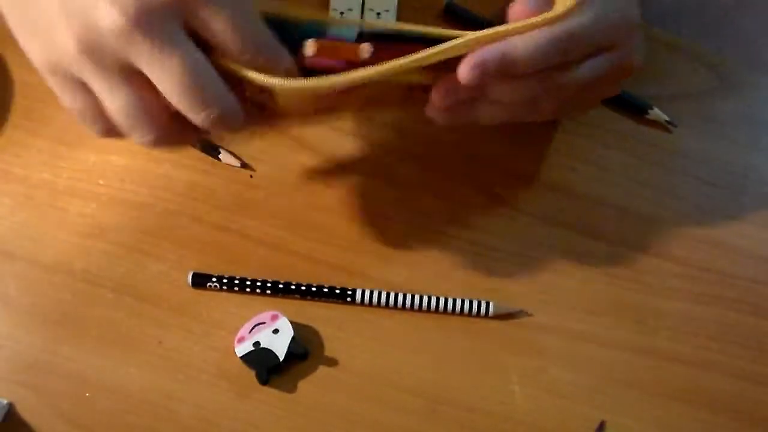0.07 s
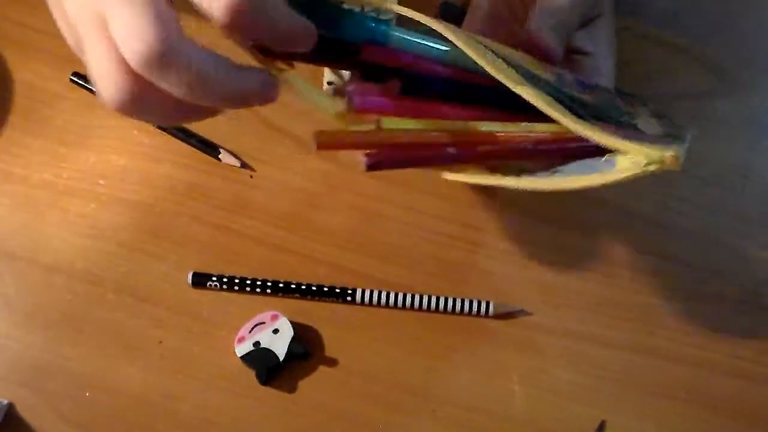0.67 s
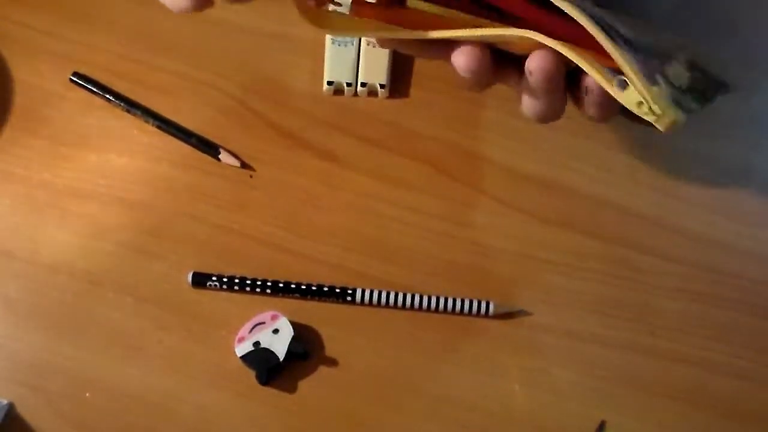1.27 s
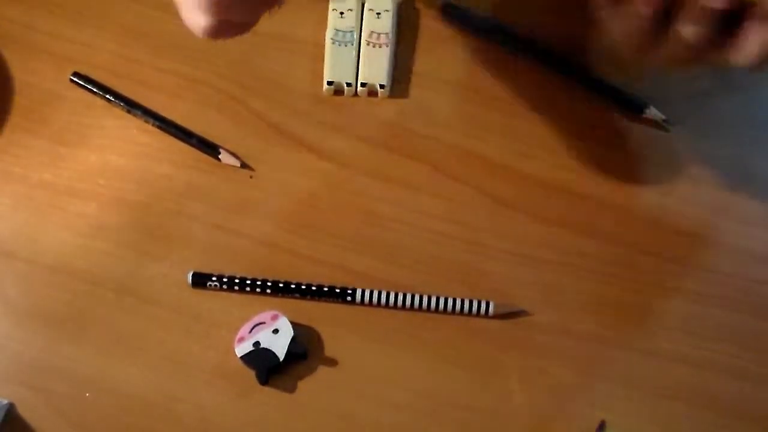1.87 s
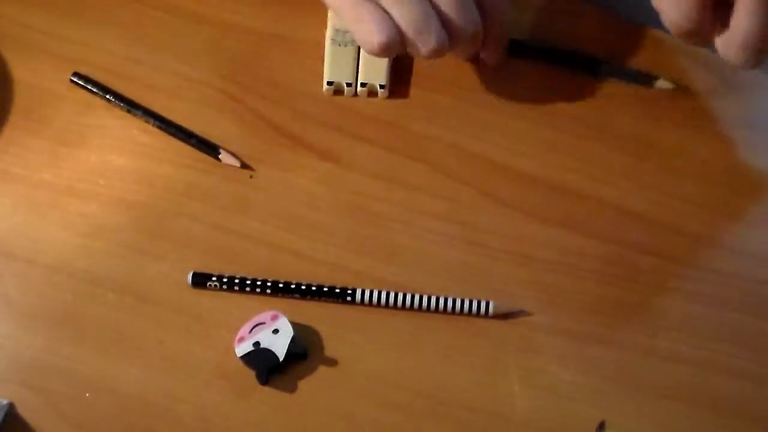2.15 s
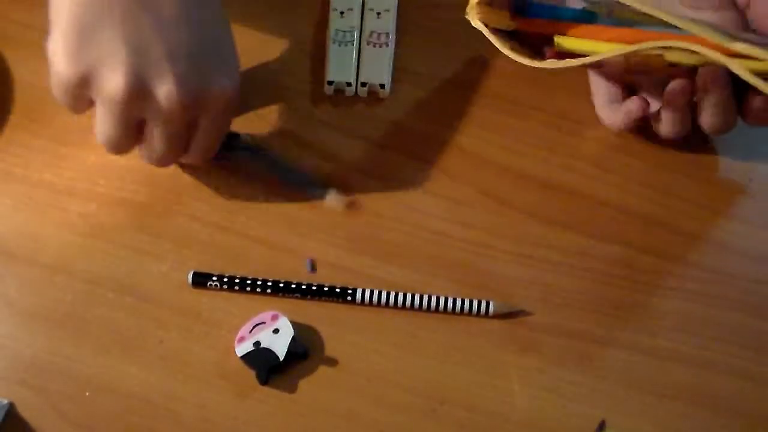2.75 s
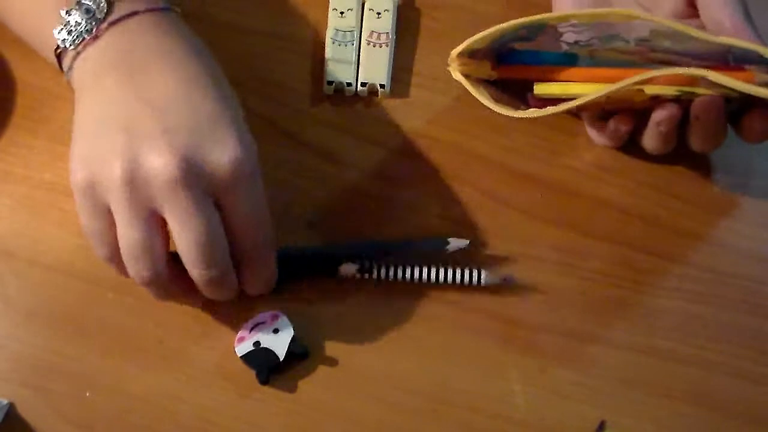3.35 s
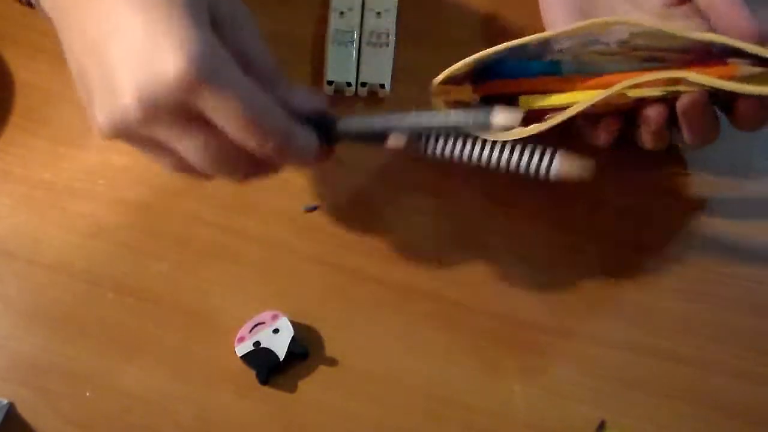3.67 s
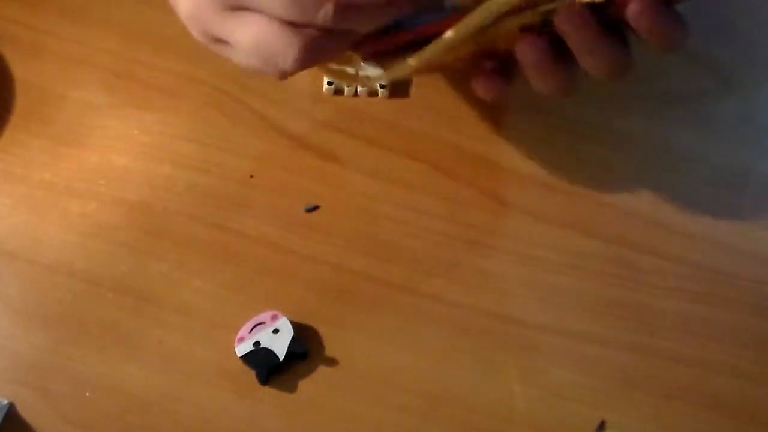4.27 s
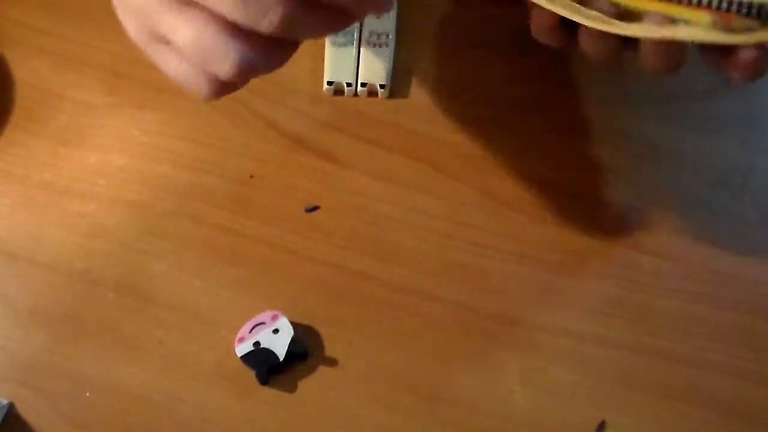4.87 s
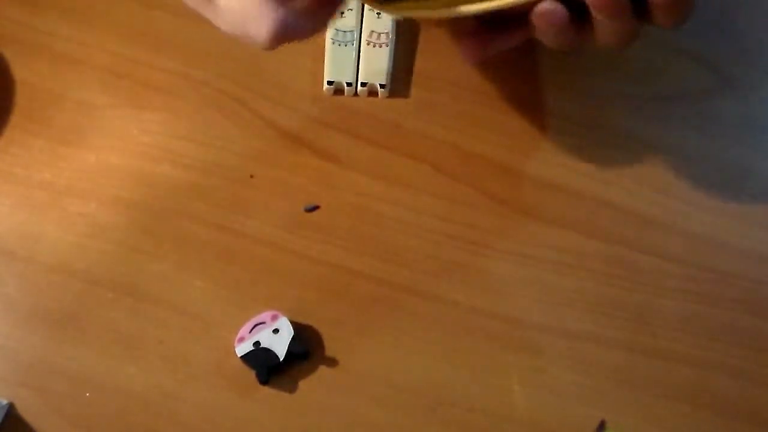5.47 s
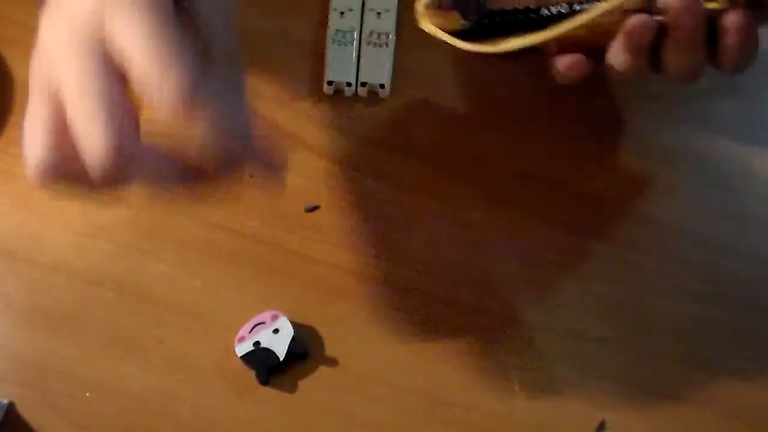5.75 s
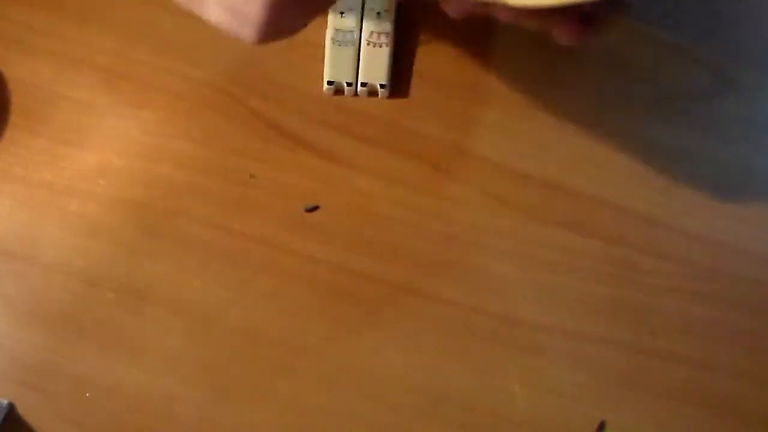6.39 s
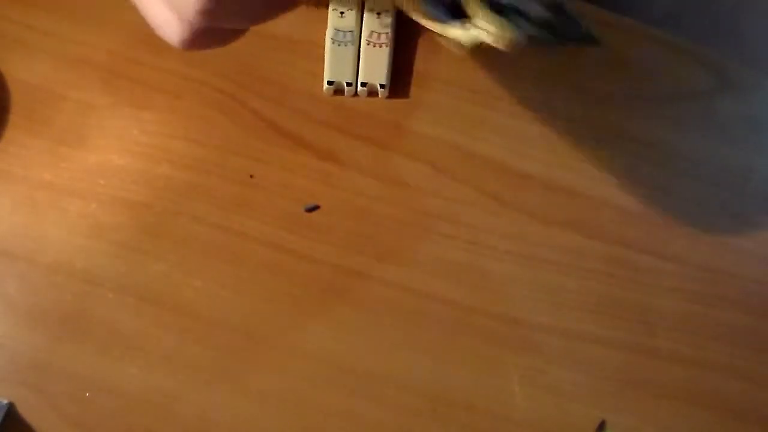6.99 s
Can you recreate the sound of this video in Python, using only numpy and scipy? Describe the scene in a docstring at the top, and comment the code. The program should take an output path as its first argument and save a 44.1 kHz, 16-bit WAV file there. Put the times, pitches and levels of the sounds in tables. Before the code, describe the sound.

Wooden coloured pencils click, clatter and scrape into a rustling fabric case, with a few taps on a wooden desk.

```python
"""At a wooden desk in a small, quiet room, coloured pencils are shuffled into a soft pencil case.
The wooden barrels scrape in many tiny slips and ring briefly when they knock together, while
the fabric rustles and the case bumps against the hand. Loose pencils and an eraser are picked up,
and each tap makes the desk top boom and ring. Under it all lie a low rumble and a faint hiss."""
import sys
import numpy as np
from scipy import signal
from scipy.fft import rfft, irfft, next_fast_len
from scipy.io import wavfile
from scipy.ndimage import map_coordinates

SR = 44100
rng = np.random.default_rng(int(sys.argv[2]) if len(sys.argv) > 2 else 0)


def log_audio(samples):
    """Write samples as a 16-bit WAV file to the path given in sys.argv[1]."""
    # one column per channel
    frames = np.atleast_2d(samples).T
    # limit to full scale, then quantise
    limited = np.clip(frames, -1, 1)
    pcm = np.round(limited * 32767).astype(np.int16)
    wavfile.write(sys.argv[1], SR, pcm)


N = 318381

# How loud the room's rumble is. Each row: time in seconds, level in dB.
RUMBLE_LEVELS = [(0, -61), (.5, -55.5), (1.43, -50.5), (1.871, -57), (2.2, -51), (2.9, -57.5),
                 (4.12, -54.5), (4.85, -63), (5.3, -52), (6.05, -70), (6.33, -55), (7.22, -57)]
# The tone of four noises. Each row: frequency in Hz, relative level in dB.
RUMBLE_TONE = [(15, -16.5), (26, 3), (33, -10), (50, -7.5), (70, -21.5), (110, -15), (250, -66)]
HISS_TONE = [(30, 1.5), (110, -6.5), (250, -5.5), (400, -11.5), (900, -13.5), (2000, -14.5), (6000, -19),
             (14000, -23)]
FABRIC_TONE = [(2500, -11), (5000, -4), (7000, -0.5), (10500, -2.5), (14000, -3)]
BUMP_TONE = [(40, -2), (90, -3.5), (150, -3), (235, 2.5), (340, -8), (520, -6), (900, -12.5), (2000, -38)]
# How hard the hands work as they shake the pencils down, put the case aside, push in the loose pencils,
# add the eraser and close the case. Each row: time in seconds, effort in dB.
HAND_EFFORT = [(0, -48), (0.099, -66), (.29, -45), (.43, -48), (.59, -35), (.73, -38.5), (0.779, -48),
               (.88, -40), (1.01, -41), (1.089, -52), (1.16, -40), (1.35, -50), (1.48, -43), (1.62, -50),
               (1.869, -45.5), (1.99, -51), (2.5, -52), (2.85, -55.5), (3.032, -80), (3.42, -51),
               (3.58, -72), (3.75, -64), (4.03, -72), (4.16, -51.5), (4.32, -53), (4.42, -38.5),
               (4.56, -38), (4.619, -53.5), (4.7, -50.5), (4.781, -74), (4.96, -52), (5.051, -66),
               (5.22, -52.5), (5.58, -53), (5.66, -43), (5.77, -64), (5.85, -57), (5.93, -85), (6.2, -78),
               (6.4, -61), (6.56, -64.5), (6.75, -47), (6.881, -53), (7.01, -47), (7.22, -68)]
# Where the bundle of pencils and the hollow of the case ring.
# Each row: pitch in Hz, width in Hz, relative level in dB.
BUNDLE_RINGS = [(506.5, 26, -6), (710, 150, -26), (1300, 490, -14.5), (1540, 93, -6.5), (1785, 37, -9),
                (2071, 147, -5.5), (2578, 79, -5.5), (3210, 780, -16.5), (3740, 380, -19.5), (5540, 41, -8),
                (7070, 200, -5.5), (8900, 1600, -21)]
CASE_RINGS = [(1620, 360, -2), (2590, 240, -3)]
# How deep in the case the barrels slide. Each row: time in seconds, depth from 0 (outside) to 1 (inside).
CASE_DEPTH = [(0, 0), (2.6, 0.27), (4.15, 0.15), (4.55, 0.74), (5.4, 0.2), (7.22, 0.02)]
# The fabric drags along the pencils, and the case bumps the hand.
# Each row: time of the peak in seconds, half length in seconds, level in dB.
FABRIC_SWISHES = [(.62, .08, -51), (3.5, 0.014, -55), (3.75, 0.086, -69), (4.413, 0.044, -47.5),
                  (5.502, 0.037, -52.5), (6.715, 0.062, -54)]
CASE_JOLTS = [(.58, 0.027, -61), (4.365, 0.012, -47), (4.55, 0.031, -55), (5.16, 0.042, -65),
              (5.66, 0.013, -53), (6.63, 0.054, -59)]
# The borders in Hz of five ranges, from low to high: thud, knock, wood, click and snap.
RANGE_EDGES = [74, 350, 900, 2800, 6500, 14500]
# An average clack: its relative levels in dB in the wood, click and snap ranges.
CLACK_TONE = [0, -1.25, -8]
# The main knocks of pencil on pencil. Each row: start in seconds, level in dB, hardness in dB per octave,
# pitch of the struck barrel in Hz, seconds for the chatter to fade by 60 dB.
PENCIL_CLACKS = [(0.152, -44.5, -1, 1270, 0.083), (0.2057, -32.5, -11, 2190, 0.022),
                 (0.2854, -30, -3.5, 1600, 0.043), (.291, -32, -2, 2080, .04),
                 (.316, -29, 0.5, 4120, 0.042), (.37, -33, 1.5, 2040, 0.067), (.396, -34, 3.5, 2130, 0.04),
                 (0.45, -31.5, 0.5, 1570, 0.063), (.455, -32, 0.5, 1530, 0.07),
                 (0.5008, -36, -5, 1950, 0.12), (0.5645, -46, 8.5, 1100, 0.16), (.57, -31, -8, 995, 0.16),
                 (.581, -34, 5.5, 2120, 0.052), (.589, -38, 6, 7040, 0.036), (.611, -49, 11.5, 10600, .034),
                 (0.621, -52, 12, 1100, .032), (.651, -50.5, 9.5, 6960, 0.066),
                 (0.6736, -45, 7, 2060, 0.032), (.694, -45.5, 7.5, 1530, 0.12),
                 (.725, -35, 1.5, 2090, 0.06), (.732, -32.5, 2, 2400, .024), (.807, -35.5, 0.5, 2040, 0.12),
                 (.893, -34.5, -1, 2520, 0.054), (0.9631, -29, 3, 4200, 0.036),
                 (1.018, -32.5, 1.5, 2120, 0.065), (1.062, -34.5, -19, 1177, .02),
                 (1.1379, -33.5, 2, 2100, 0.081), (1.173, -35, -3, 2080, 0.058),
                 (1.459, -36.5, -2, 2130, 0.054), (1.47, -25, 0, 4020, 0.025),
                 (1.539, -37, -1, 1770, 0.078), (1.73, -40.5, 2, 1560, 0.065),
                 (1.82, -31.5, -4, 2800, 0.041), (1.833, -37.5, -3, 2050, 0.16),
                 (1.89, -35, -2, 1720, 0.038), (1.8982, -26.5, 0.4, 3310, 0.054),
                 (2.026, -42.5, -1, 1920, 0.2), (2.092, -40, -1, 2100, 0.022), (2.14, -35, -7, 1530, 0.04),
                 (2.276, -38, -2, 1656, 0.095), (2.3113, -42.5, -8, 2090, 0.041),
                 (2.361, -40.5, -0.5, 7160, 0.068), (2.422, -43, -19, 1840, .09),
                 (2.51, -50, -1, 1570, 0.045), (2.611, -40.5, 0, 1260, 0.078),
                 (3.1269, -37, -1.5, 2160, 0.021), (4.124, -40, -2.5, 2120, 0.085),
                 (4.133, -43.5, 4, 1660, 0.078), (4.359, -46, -3, 1420, 0.071),
                 (4.403, -44, 5, 3620, 0.081), (4.473, -42, 4.5, 1560, .08),
                 (4.504, -27.5, 1.5, 1560, 0.062), (4.548, -25.5, -2.5, 1670, 0.043),
                 (4.568, -41, 6, 1760, 0.088), (4.575, -29, 3, 1630, 0.031), (4.643, -45, 0.5, 1580, 0.098),
                 (4.688, -43, -2, 1515, 0.1), (4.857, -50, -8.5, 1530, .08), (4.95, -46, -0.5, 4100, .04),
                 (4.963, -46.5, 1, 1640, 0.045), (5.206, -44.5, -3, 1510, 0.15),
                 (5.232, -39, -3.5, 1470, 0.044), (5.6191, -34, 3, 1720, 0.064),
                 (5.679, -36, -1.5, 1820, 0.064), (5.686, -45.5, 11.5, 2550, .022),
                 (5.701, -38, -4, 1520, 0.04), (5.749, -42.5, 1.5, 3820, .026), (5.8712, -47, 0, 4000, .02),
                 (5.981, -58, 0, 1250, 0.035), (6.059, -57.5, 2, 2700, 0.026),
                 (6.252, -51.5, -13, 1300, 0.016), (6.299, -52.5, 0.5, 2650, 0.044),
                 (6.704, -41.5, 0, 1550, 0.082), (6.794, -34.5, -4, 1620, 0.049),
                 (6.926, -38.5, -3.5, 2170, 0.06), (6.987, -39.5, -1.5, 1580, 0.11),
                 (7.089, -45.5, -3.5, 1670, 0.095)]
# Taps on the desk. Each row: start in seconds, level in dB, hardness in dB per octave, kind of contact.
DESK_TAPS = [(2.177, -27.5, -0.5, "hand"), (2.659, -32.5, -.5, "tip"), (2.693, -36, .5, "tip"),
             (2.714, -38.5, 0, "tip"), (2.789, -30, 1, "barrel"), (2.814, -51, 2, "barrel"),
             (2.834, -34.5, 2.5, "rebound"), (2.842, -34, -3, "rebound"), (2.864, -42, 0, "barrel"),
             (2.983, -53, 0.5, "hand"), (3.2228, -32, 2, "barrel"), (3.32, -39.5, -1, "barrel"),
             (3.356, -36, 0, "barrel"), (6.066, -49.5, 0.5, "eraser"), (6.086, -53, 1, "eraser"),
             (6.125, -49.5, -2.5, "eraser")]
# The tone of each kind of contact. Each entry: relative levels in dB in the five ranges, thud to snap.
CONTACT_TONES = {"hand": (0.5, -12.5, -11.5, -17.5, -19.5), "tip": (-6.5, -1, -18, -14, -7.5),
                 "barrel": (-10, -3, -1, -3, -9.5), "rebound": (-22, -30, -3.5, -10, -21),
                 "eraser": (-1, -25, -20, -16, -27)}
# The desk top's low notes. Each row: pitch in Hz, relative level in dB, seconds to fade by 60 dB.
DESK_NOTES = [(107.3, 0, 0.48), (180, -6, 0.41), (212, 5, 0.25), (230, 8.5, 0.12), (293, -0.5, .22),
              (402, -16, 0.096), (466, -6, 0.25), (504, 10, 0.23), (576, 0, 0.33)]
# The thin ring of a loose pencil on the desk. Each row: pitch in Hz, width in Hz, relative level in dB.
LOOSE_PENCIL_RINGS = [(4080, 200, 5), (5720, 120, 1), (10200, 200, 7), (11800, 400, 13)]
# How long the desk and the room ring on. Each row: frequency in Hz, seconds to fade by 60 dB.
DESK_FADE = [(100, 0.37), (500, 0.4), (2000, 0.38), (5000, 0.19), (12000, 0.12)]
ROOM_FADE = [(200, 0.48), (2000, 0.31), (6000, 0.27), (13000, 0.21)]
# Stereo width. Sounds are built as mid (what left and right share) and side (how they differ).
# Each row: frequency in Hz, gain of the side in dB.
STEREO_WIDTH = [(60, -14), (200, -21.5), (700, -19.5), (1400, -22.5), (2800, -15), (5500, -6.5),
                (10000, -2.5), (14000, -4)]
# How the microphones soften the treble. Each row: frequency in Hz, gain in dB.
MICROPHONE_TONE = [(10500, 0), (12000, -2.5), (14000, -5.5)]

USUAL_EFFORT_DB, FABRIC_DB, BUMP_DB = -44.5, -54.5, -57  # the usual effort and the base levels it gives
FABRIC_GROWS, BUMP_GROWS = 0.83, 0.72  # dB gained for each extra dB of effort
CLINK_HZ, CLINK_SPREAD = 4020, 0.013  # the high bending note all pencils share; it varies by about 1.3%
TREBLE_LIMIT_HZ = 14300


def amp(db):
    """Turn decibels into a number to multiply by."""
    return 10 ** (np.asarray(db) / 20)


def unit(x):
    """Scale each channel to an average (rms) size of 1."""
    return x / np.sqrt(np.mean(x ** 2, axis=-1, keepdims=True) + 1e-20)


def at_pitch(rows, hz):
    """Read between (Hz, value) rows, giving each octave about the same room."""
    pitches, values = np.transpose(rows)
    return np.interp(np.log(hz + 1), np.log(pitches + 1), values)


def over_time(rows):
    """Join (seconds, value) rows with straight lines, one value for each sample."""
    return np.interp(np.arange(N) / SR, *np.transpose(rows))


def wobble(rate):
    """A smooth curve through `rate` random points a second."""
    return map_coordinates(rng.standard_normal(int(N * rate / SR) + 4), [np.arange(N) * rate / SR])


def filtered(x, response):
    """Multiply each frequency in x by response(hz)."""
    length = x.shape[-1]
    padded = next_fast_len(length + SR // 10)
    return irfft(rfft(x, padded) * response(np.fft.rfftfreq(padded, 1 / SR)), padded)[..., :length]


def noise(tone):
    """Mid and side noise with the given tone, at an average size of 1."""
    return unit(filtered(rng.standard_normal((2, N)), lambda hz: amp(at_pitch(tone, hz))))


def resonances(rings, hz):
    """How an object answers each frequency, given the (pitch, width, dB) rows at which it rings."""
    return sum(amp(db) * 1j * hz * width / (pitch * pitch - hz * hz + 1j * hz * width)
               for pitch, width, db in rings)


def band(x, low_hz, high_hz):
    """Keep the sound between two frequencies."""
    return signal.sosfilt(signal.butter(5, [low_hz, high_hz], btype="band", fs=SR, output="sos"), x)


def set_ranges(x, edges, levels_db, span_s):
    """Scale each frequency range so that its first span_s seconds have the wanted level."""
    parts = [band(x, low, high) for low, high in zip(edges, edges[1:])]
    return sum(amp(db) * part / part[:, :int(span_s * SR)].std(axis=1, keepdims=True)
               for part, db in zip(parts, levels_db))


def tilted(tone, hardness_db):
    """Tip a tone's levels around the wood range: a harder contact has more treble and less bass."""
    centres = np.sqrt(np.multiply(RANGE_EDGES[:-1], RANGE_EDGES[1:]))
    octaves = np.log2(centres / centres[2])
    return np.array(tone) + hardness_db * octaves[-len(tone):]


def swell(t, attack_s):
    """A quick rise from 0 to 1, as a contact builds up."""
    return 1 - np.exp(-t / attack_s)


def fade(t, t60):
    """A smooth fall of 60 dB every t60 seconds."""
    return np.exp(-np.log(1000) * t / t60)


def tail(fade_times):
    """Half a second of dense ringing: noise in which each frequency dies at its own speed."""
    hz, t, spectrum = signal.stft(rng.standard_normal((2, SR // 2)), SR, nperseg=256)
    dying = spectrum * amp(-60 * t / at_pitch(fade_times, hz)[:, None])
    return signal.istft(dying, SR, nperseg=256)[1][:, :SR // 2]


def surges(rows):
    """A smooth rise and fall of gain for each (peak time, half length, dB) row."""
    t = np.arange(N) / SR
    return sum(amp(db) * np.exp(-((t - peak_s) / half_s) ** 2) for peak_s, half_s, db in rows)


def add(track, start_s, sound):
    """Mix a sound into the track at its start time."""
    part = track[:, max(round(start_s * SR), 0):][:, :sound.shape[1]]
    part += sound[:, :part.shape[1]]


def rumble_and_hiss(hiss_db=-61.5, hiss_side_db=-2, rumble_side_db=-10):
    """The room's low rumble, nearly alike at both microphones, and their own faint hiss."""
    rumble = amp(over_time(RUMBLE_LEVELS)) * noise(RUMBLE_TONE)
    hiss = amp(hiss_db) * noise(HISS_TONE)
    return np.array([rumble[0] + hiss[0], amp(rumble_side_db) * rumble[1] + amp(hiss_side_db) * hiss[1]])


def slips(per_second, spread_db):
    """Wood slips on wood in tiny clicks of random size, at random moments."""
    size = amp(spread_db * np.minimum(rng.exponential(size=N), 3))
    slipping = rng.random(N) < per_second / SR
    return unit(slipping * size * rng.standard_normal((2, N)))


def bundle_rings(detune, vary_db):
    """The bundle rings a little differently with each grip and point of contact."""
    return [(hz * (1 + rng.normal(0, detune)), width, db + rng.normal(0, vary_db))
            for hz, width, db in BUNDLE_RINGS]


def scraping(direct=0.23, swing_db=5.0, pairs=4):
    """Pairs of barrels take turns slipping, each with its own ring; inside the case they sound hollow."""
    total = 0
    for _ in range(pairs):
        rings = bundle_rings(detune=0.035, vary_db=6)
        clicks = slips(per_second=1800, spread_db=-0.5)
        scrape = filtered(clicks, lambda hz: direct + resonances(rings, hz))
        total = total + amp(swing_db * wobble(30)) * scrape
    outside = unit(band(total, 392, 5000))
    inside = unit(filtered(outside, lambda hz: resonances(CASE_RINGS, hz)))
    depth = np.clip(over_time(CASE_DEPTH), 0, 1)
    return (1 - depth) * outside + depth * inside


def handling(scrape_db=-0.9, jerk_db=3.5):
    """One effort of the hands makes the barrels scrape, the fabric rustle and the case bump softly."""
    effort_db = over_time(HAND_EFFORT)
    extra_db = effort_db - USUAL_EFFORT_DB
    jerks_db = jerk_db * wobble(70)  # the sliding catches and lets go
    barrels = amp(effort_db + scrape_db + jerks_db) * scraping()
    fabric_gain = amp(FABRIC_DB + FABRIC_GROWS * extra_db) + surges(FABRIC_SWISHES)
    fabric = fabric_gain * amp(jerks_db) * noise(FABRIC_TONE)
    bump_gain = amp(BUMP_DB + BUMP_GROWS * extra_db) + surges(CASE_JOLTS)
    bumps = bump_gain * amp(4.6 * wobble(25)) * noise(BUMP_TONE)
    return barrels + fabric + bumps


def clack(levels_db, barrel_hz, clink_hz, t60,
          blow=11, crack_db=8, crack_share=0.19, rebound=0.35, barrel_db=5, clink_db=-4.0):
    """A hard hit, a quick rebound and a dying chatter make one barrel and its neighbours ring."""
    t = np.arange(SR // 10) / SR
    since_rebound = t - rng.uniform(.001, .0035)
    contact_s = crack_share * t60  # square blows are brief, glancing ones drag and chatter on
    crack = fade(t, contact_s) + rebound * (since_rebound > 0) * fade(np.abs(since_rebound), contact_s)
    strength = swell(t, attack_s=contact_s / 8) * (fade(t, t60) + amp(crack_db) * crack)
    force = strength * rng.standard_normal((2, len(t)))
    force[:, SR // 1000] += blow * rng.choice([-1, 1], size=2)  # the full blow follows the first touch
    clink_width = 110 + (clink_hz / 300) ** 2  # wider means shorter: wood damps high notes much faster
    rings = bundle_rings(detune=0.025, vary_db=6.0)
    rings += [(barrel_hz, barrel_hz / 20, barrel_db), (clink_hz, clink_width, clink_db)]
    ringing = filtered(force, lambda hz: .2 + resonances(rings, hz))
    low_db = levels_db[0] - 19  # light barrels give off little sound below their bending notes
    return set_ranges(ringing, [390] + RANGE_EDGES[2:], [low_db, *levels_db], span_s=0.0036)


def jostling(offset_db=-1.5, vary_db=2.1, hardness_db=0.4,
             barrel_hz=1900, pitch_spread=0.225, t60=0.081, count=36):
    """Pencils jostle in small random clacks, closer together and louder when the hands work harder."""
    track, effort_db = np.zeros((2, N)), over_time(HAND_EFFORT)
    work_done = np.cumsum(amp(effort_db / 2))
    # one clack falls somewhere in each equal share of the work
    starts = np.searchsorted(work_done, work_done[-1] * (np.arange(count) + rng.random(count)) / count)
    for start, (size, hardness, pitch) in zip(starts, rng.standard_normal((count, 3))):
        tone = tilted(CLACK_TONE, hardness_db + 2 * hardness)
        levels_db = effort_db[start] + offset_db + vary_db * size + tone
        add(track, start / SR, clack(levels_db, barrel_hz * np.exp(pitch_spread * pitch), CLINK_HZ, t60))
    return track


def pencil_clacks():
    """Pencils knock against each other in the hand and in the case."""
    track = np.zeros((2, N))
    for start_s, db, hardness_db, barrel_hz, t60 in PENCIL_CLACKS:
        clink_hz = CLINK_HZ * np.exp(CLINK_SPREAD * rng.normal())
        add(track, start_s, clack(db + tilted(CLACK_TONE, hardness_db), barrel_hz, clink_hz, t60))
    return track


def desk_taps(blow_t60=0.034, crack_db=6, crack_t60=0.0041, wash_db=-16, boom_db=-29.0):
    """Each tap is a short blow; the desk top then booms in low notes and a dense wash of higher ones."""
    track, t = np.zeros((2, N)), np.arange(SR // 2) / SR
    for start_s, tap_db, hardness_db, contact in DESK_TAPS:
        blow = (fade(t, blow_t60) + amp(crack_db) * fade(t, crack_t60)) * rng.standard_normal((2, len(t)))
        wash = filtered(amp(wash_db) * tail(DESK_FADE), lambda hz: 1 + resonances(LOOSE_PENCIL_RINGS, hz))
        boom = 0
        for hz, db, t60 in DESK_NOTES:
            strength = amp(db + rng.normal(0, 2)) * fade(t, t60)
            boom = boom + strength * np.sin(2 * np.pi * (hz * t + rng.random((2, 1))))
        tap = swell(t, attack_s=0.00098) * (blow + wash + amp(boom_db) * boom)
        levels_db = tap_db + tilted(CONTACT_TONES[contact], hardness_db)
        add(track, start_s, set_ranges(tap, RANGE_EDGES, levels_db, span_s=0.022))
    return track


def room_echo(x, echo_db=-13, delay_s=.006):
    """Nearby walls send the sound back after a few milliseconds."""
    echo = np.pad(tail(ROOM_FADE), ((0, 0), (int(delay_s * SR), 0)))
    return amp(echo_db) * signal.fftconvolve(x[:1], echo / np.linalg.norm(echo[0]), axes=1)[:, :N]


def scene():
    """All the sounds reach two close microphones, left and right, which differ mostly in the treble."""
    near = pencil_clacks() + desk_taps() + handling() + jostling()
    mid, side = near + room_echo(near)
    side = filtered(side, lambda hz: amp(at_pitch(STEREO_WIDTH, hz)))
    mid, side = np.array([mid, side]) + rumble_and_hiss()
    return np.array([mid + side, mid - side])


def record(dry):
    """The microphones soften the highest treble, and the sound is cut off steeply above its limit."""
    return filtered(dry, lambda hz: amp(at_pitch(MICROPHONE_TONE, hz))
                    / np.sqrt(1 + (hz / TREBLE_LIMIT_HZ) ** 240))


dry = scene()
out = record(dry)
log_audio(out)
```